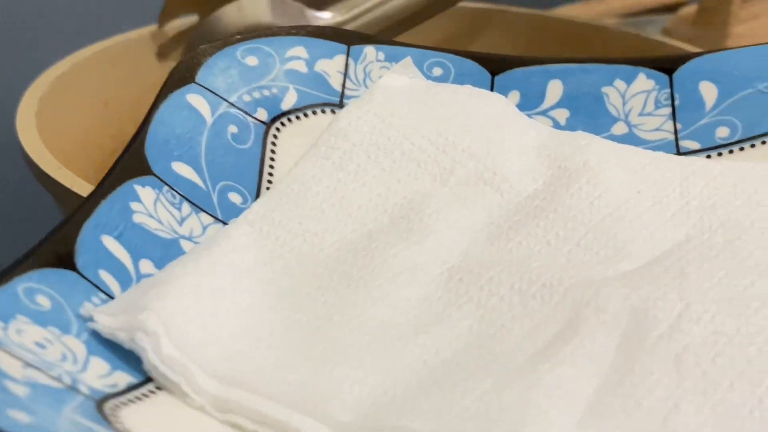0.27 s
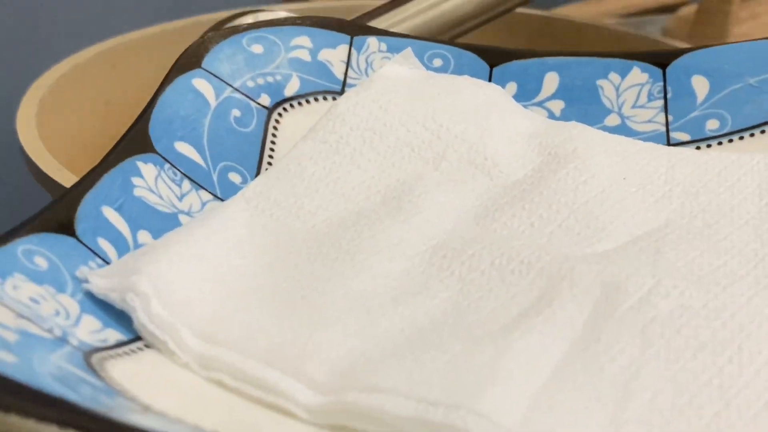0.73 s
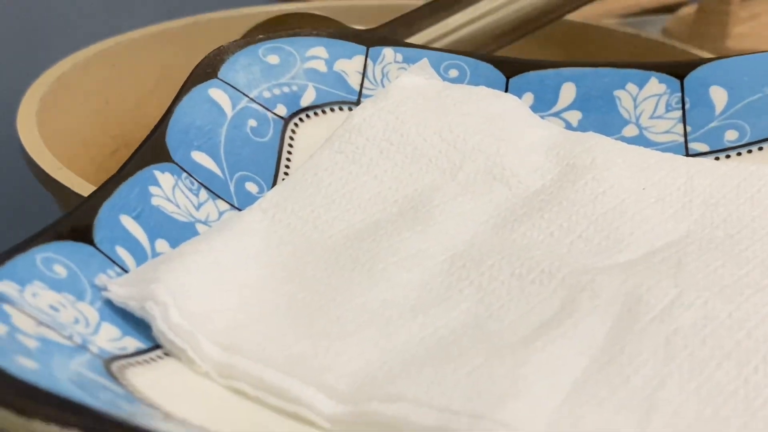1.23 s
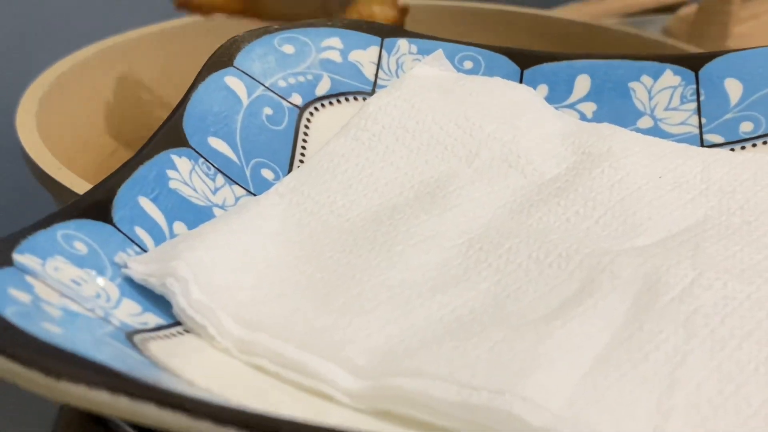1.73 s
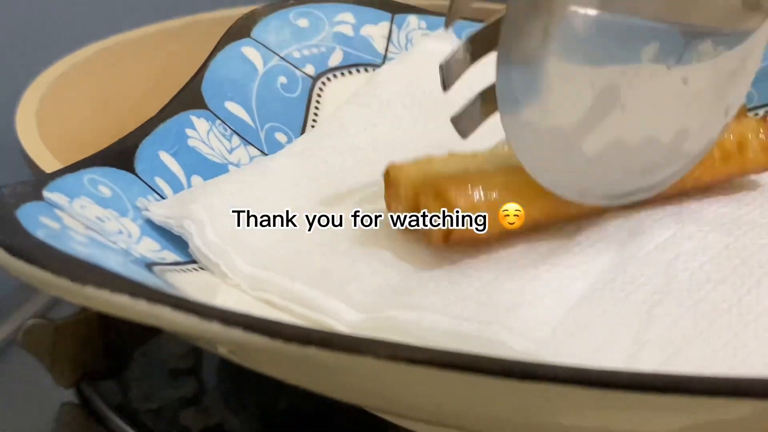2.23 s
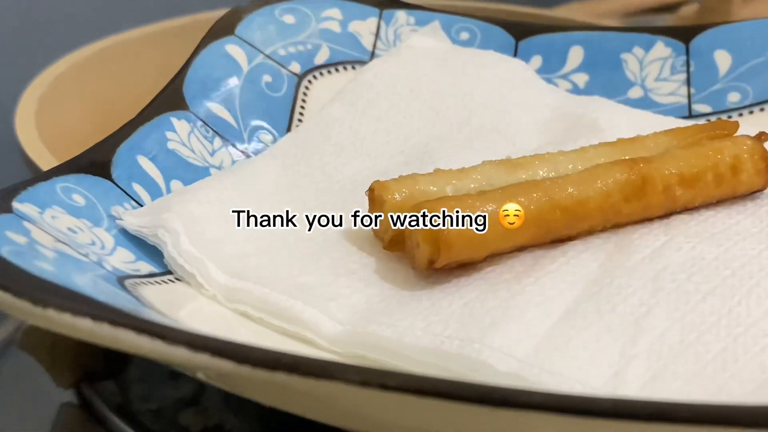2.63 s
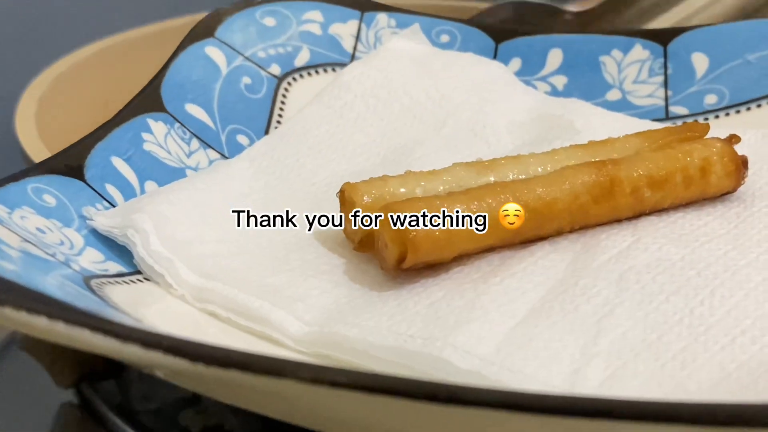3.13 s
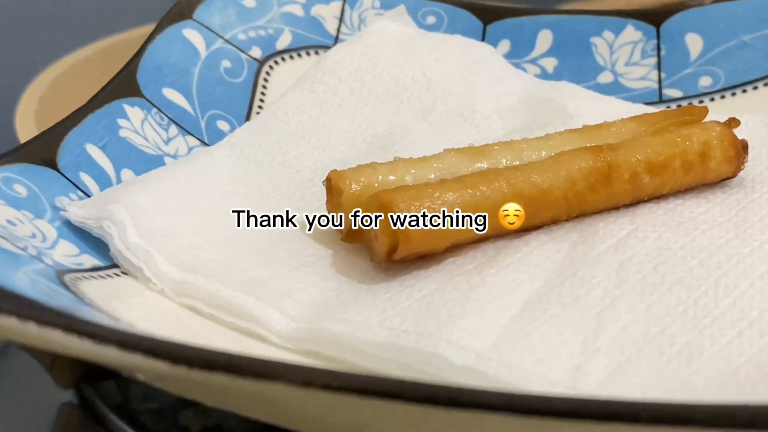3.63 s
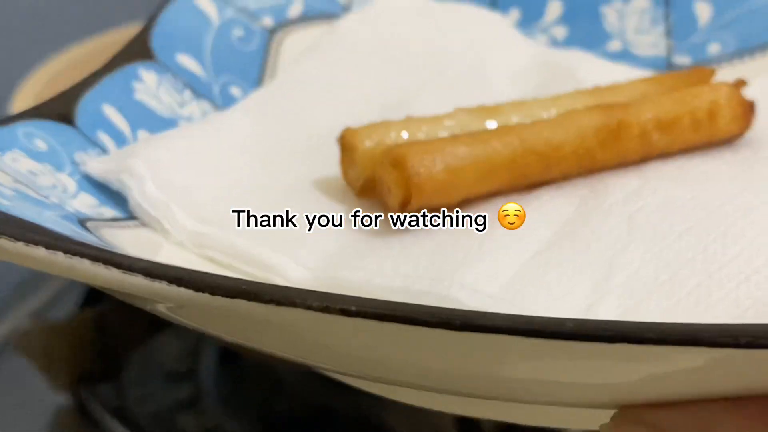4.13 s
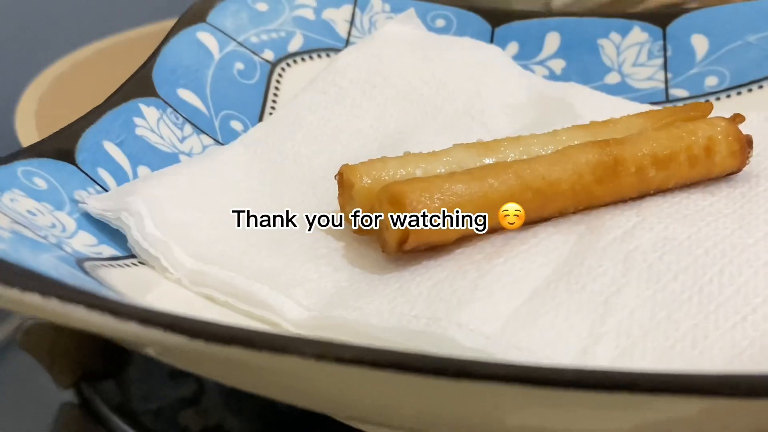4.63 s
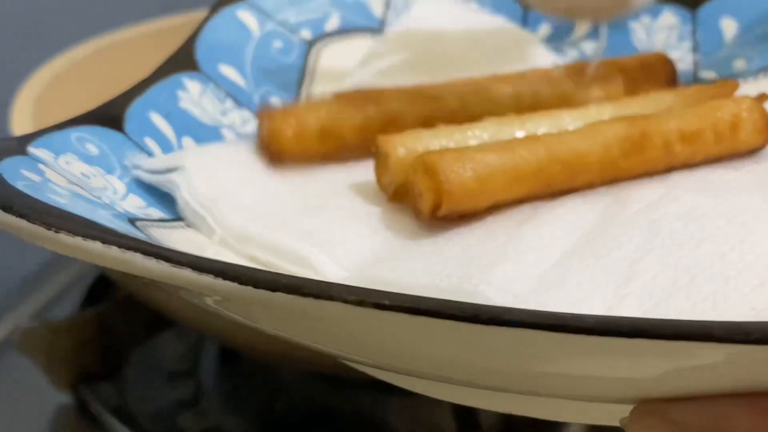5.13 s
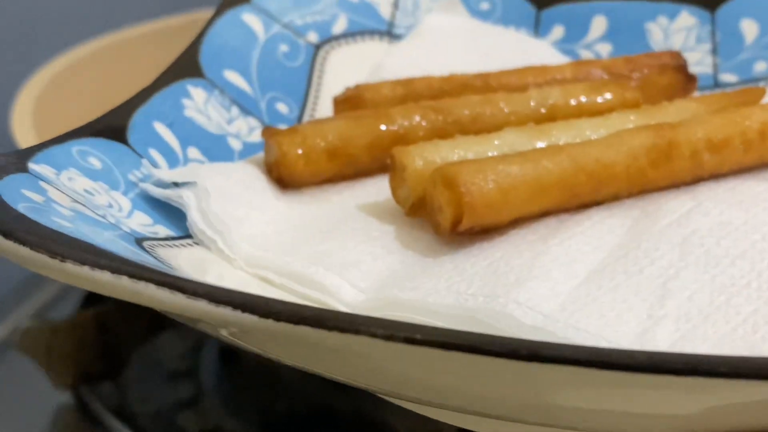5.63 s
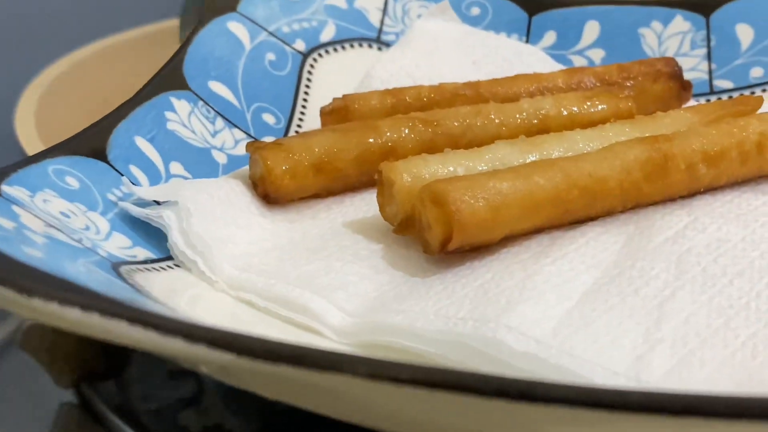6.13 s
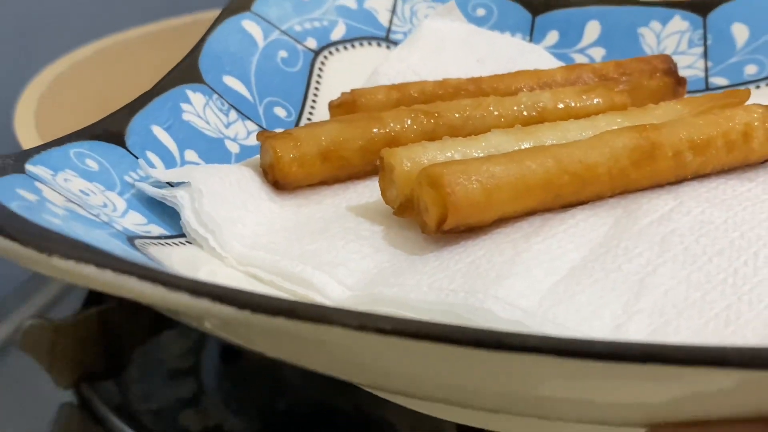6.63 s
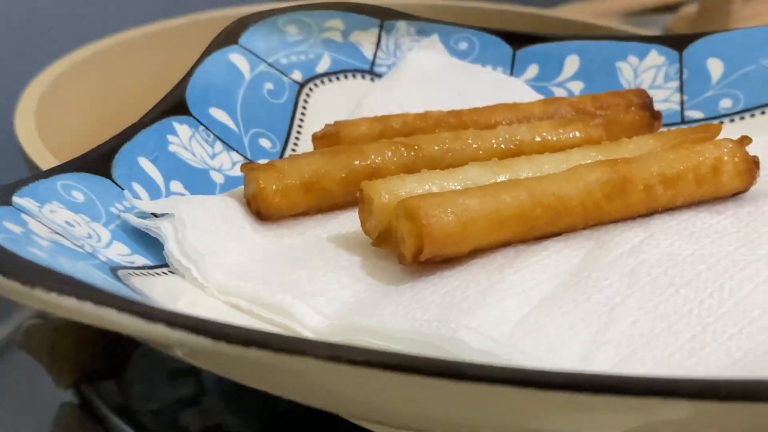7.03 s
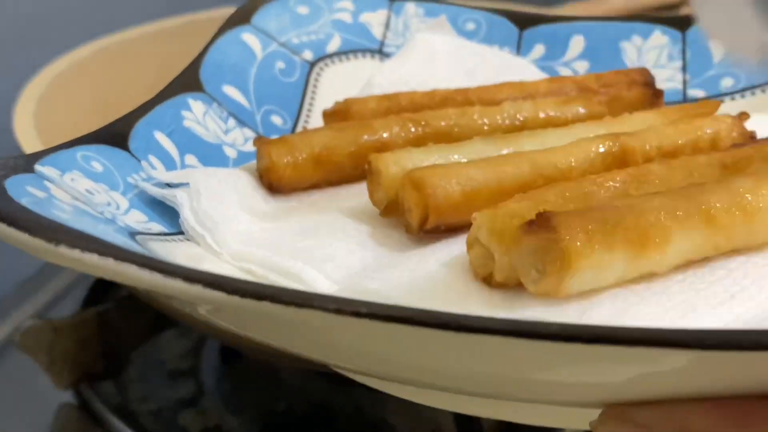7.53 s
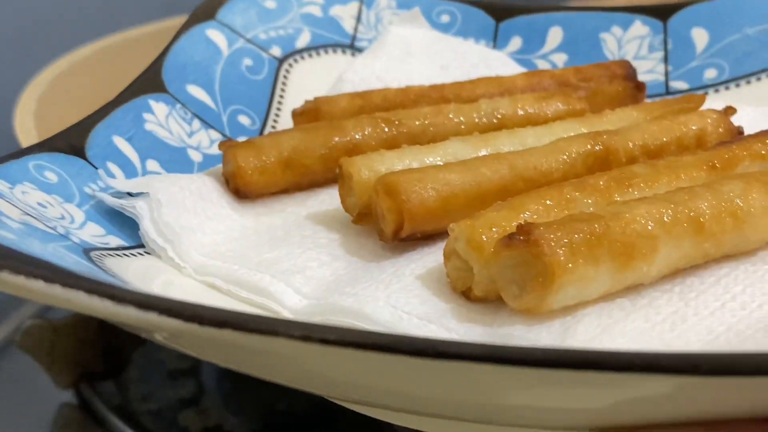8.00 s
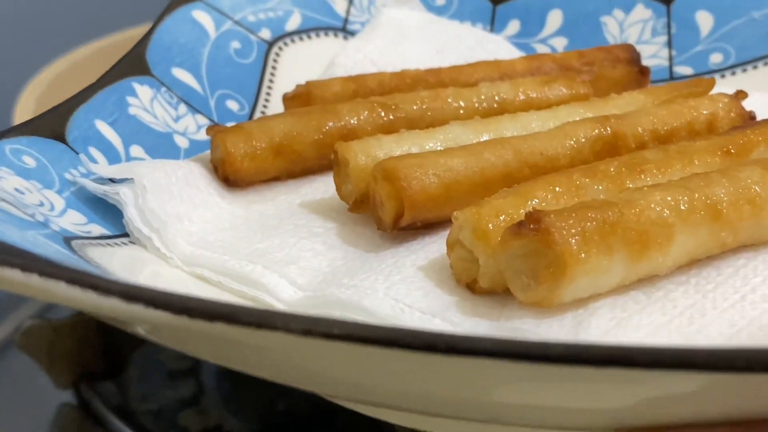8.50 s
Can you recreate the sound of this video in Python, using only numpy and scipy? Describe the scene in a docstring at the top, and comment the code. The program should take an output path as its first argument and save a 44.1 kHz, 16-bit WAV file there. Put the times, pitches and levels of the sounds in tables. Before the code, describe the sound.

Steel tongs clack and scrape in a frying pan over a faint simmer of oil and a humming cooker hood.

```python
"""Steel tongs knock, bounce and scrape in a frying pan as fried rolls are lifted out, close by.
Each knock makes a hard clack and sets the pan ringing briefly. Scraping is a run of tiny blows,
and the thin tong blades tick against each other. Bubbles simmer faintly in the hot oil,
a cooker-hood fan hums underneath, and the small kitchen's hard walls add a short echo."""
import sys
import numpy as np
from scipy import signal
from scipy.fft import rfft, irfft
from scipy.io import wavfile

SR = 44100
rng = np.random.default_rng(int(sys.argv[2]) if len(sys.argv) > 2 else 0)


def store_wav(level_fs):
    """Save 16-bit WAV to argv[1]."""
    pcm = np.round(np.clip(np.atleast_2d(level_fs), -1, 1) * 32767)
    wavfile.write(sys.argv[1], SR, pcm.T.astype(np.int16))


N = 386304


def amp(db):
    """Turns decibels into a gain."""
    return 10 ** (np.asarray(db) / 20)


def unit(x):
    """Scales a sound to an average (rms) level of 1."""
    return x / np.sqrt(np.mean(x ** 2) + 1e-20)


def read(points, hz):
    """Looks up a value between a table's rows, on a pitch scale."""
    f, value = np.transpose(points)
    return np.interp(np.log(hz + 1), np.log(f), value)


def add(mix, start_s, sound):
    """Mixes a sound in at the given time."""
    part = mix[..., max(round(start_s * SR), 0):][..., :sound.shape[-1]]
    part += sound[..., :part.shape[-1]]


def colour(x, points, size=2048):
    """Shapes the tone along (pitch [Hz], gain [dB]) points; nothing sounds early."""
    log_gain = np.log(amp(read(points, abs(np.fft.fftfreq(size, 1 / SR)))))
    taps = np.fft.ifft(np.exp(np.conj(signal.hilbert(log_gain)))).real
    return signal.oaconvolve(x, taps[None], axes=1)[:, :x.shape[1]]


def tilted(x, db_per_octave):
    """Brightens or dulls a sound around 1 kHz; flat below 500 Hz."""
    return colour(x, [(500, -db_per_octave), (1000, 0), (16000, 4 * db_per_octave)])


# the fan's low drone: (time [s], relative level [dB])
DRONE_LEVELS = [(0.0, -57), (0.36, -44), (0.46, -56), (0.78, -42.5), (1.0, -57), (1.1, -47), (2.22, -42),
                (2.49, -55), (2.61, -44), (2.9, -52), (4.03, -45.5), (4.59, -60), (5.07, -45), (5.25, -49),
                (6.05, -46), (6.54, -54.5), (7.61, -44), (8.76, -51)]
# the fan's rushing air: (pitch [Hz], relative level [dB])
AIR_TONE = [(20, -20), (38, -7), (54, 5), (100, 4.5), (140, 8.5), (180, -5), (232, 4.5), (275, -9.5),
            (450, -15.5), (720, -14), (1000, -15.5), (2300, -19), (5000, -22), (15500, -24.5)]
def fan(hum_hz=119.9, hum_db=-36.5, drone_hz=76, flutter_hz=1.6, flutter_db=-8.5, air_db=-47.5):
    """A steady mains hum, a low drone that wavers at random and a gently swelling rush of air."""
    t, hz = np.arange(N) / SR, np.fft.rfftfreq(N, 1 / SR)
    hum = amp(hum_db) * unit(np.sin(2 * np.pi * hum_hz * t))
    slow_noise = irfft(rfft(rng.standard_normal((3, N))) / (1 + (hz / flutter_hz) ** 2), N)
    along, across, swell = unit(slow_noise)
    flutter = 1 + amp(flutter_db) * (along + 1j * across)  # wavers in level and pitch
    drone = unit((flutter * np.exp(2j * np.pi * drone_hz * t)).real)
    drone *= amp(4 + np.interp(t, *np.transpose(DRONE_LEVELS)))
    air = irfft(rfft(rng.standard_normal((2, N))) * amp(read(AIR_TONE, hz)), N)
    return hum + drone, amp(air_db - 0.45 * swell) * unit(air)


# the simmer dies down as the pan empties: (time [s], level [dB])
SIMMER_LEVELS = [(0, -52), (3.6, -53.5), (4.4, -55), (8.76, -57.5)]
def oil(pops_per_s=900, spread_db=1.0):
    """Tiny bubbles burst in the cooling oil, over a soft hiss."""
    pops = rng.random((2, N)) < pops_per_s / SR
    sizes = amp(spread_db * np.minimum(rng.exponential(1, (2, N)), 4))
    fizz = unit(pops * sizes * rng.choice([-1, 1], (2, N))) + rng.standard_normal((2, N))
    fizz = colour(fizz, [(200, 5.2), (1400, 13.6), (3200, 13.5), (6500, 6.9), (8500, 2.3), (15500, 3)])
    return unit(fizz) * amp(np.interp(np.arange(N) / SR, *np.transpose(SIMMER_LEVELS)))


def burst(t, rise_s, fall_s):
    """Metal touching metal: a short chatter of noise with energy 1."""
    shape = (1 - np.exp(-(t / rise_s) ** 2)) * np.exp(-t / fall_s)
    noise = rng.standard_normal((2, len(t))) * shape
    for _ in range(3):  # even out the pitches, keeping the burst short
        spectrum = rfft(noise)
        noise = irfft(spectrum / (abs(spectrum) + 1e-12), len(t)) * np.sqrt(shape)
    return noise / np.linalg.norm(noise, axis=1, keepdims=True)


# the notes a tong blade rings at: (pitch [Hz], relative level [dB], time to fade 60 dB [s])
BLADE_NOTES = [(1550, 13, 0.019), (1940, -10, .05), (2810, 24.5, 0.022), (3080, 22, 0.066),
               (3775, 26, 0.053), (5130, -8, 0.053), (5520, 26, 0.048), (6850, 25, 0.054),
               (7500, 14, 0.013), (8000, 21, 0.018), (11100, 15, 0.031), (11300, 7, 0.0007)]
# the blades clink, alone or shaken by a hard blow:
# (time [s], relative level [dB], tilt [dB per octave], contact length [s], favoured pitch [Hz])
BLADE_TICKS = [(0.036, -58.5, -3, 0.069, 11500), (0.078, -53, 8, 0.0049, 11000),
               (0.274, -52, 0.5, 0.0078, 6850), (0.822, -51, -2.5, 0.0062, 2850),
               (.83, -46, 3.5, 0.007, 11400), (.833, -46.5, -2, 0.011, 3070), (0.857, -49, 0, 0.0075, 3700),
               (1.139, -39, -0.5, 0.007, 4200), (3.568, -55, 7, 0.0061, 11450),
               (3.8, -55.5, -2, 0.08, 11100), (3.873, -48, -2, 0.014, 4600),
               (5.615, -51, -2.5, 0.011, 11100), (8.031, -41, -6, 0.0093, 11300),
               (8.06, -57, -15, 0.013, 11400)]
def ticks(t, ping_db=7.0, ping_ratio=1.3):
    """The thin blades graze each other in short, rough clinks; the spot touched favours one note."""
    out = np.zeros((2, N))
    blade = sum(amp(db - 60 * t / fade_s) / fade_s * np.sin(2 * np.pi * hz * t)
                for hz, db, fade_s in BLADE_NOTES)
    blade /= np.linalg.norm(blade)
    for start, db, tilt, contact_s, hz in BLADE_TICKS:
        graze = burst(t, rise_s=0.00087, fall_s=contact_s)
        snap = colour(graze, [(300, -14), (2500, 2), (8000, 0), (16000, -2)])
        ringing = signal.fftconvolve(graze, blade[None], axes=1)[:, :len(t)]
        ping = [(100, -20), (300, 0), (hz / ping_ratio, 0), (hz, ping_db), (hz * ping_ratio, 0)]
        clink = colour(tilted(ringing + snap, tilt), ping)
        add(out, start, amp(db + 11) * clink / clink[0, :SR // 100].std())
    return out


# the notes the pan rings at: (pitch [Hz], relative level [dB], time to fade 60 dB [s])
PAN_NOTES = [(232.3, 0, 0.17), (377, -4.5, 0.6), (456, 3, 0.18), (524, -4, 0.26), (663.5, 8, 0.17),
             (710, 4, .09), (738.8, 7, 0.14), (845, 0.5, 0.074), (936, -11, 0.063), (1020, -5, 0.084),
             (1130, -26, .06), (1333, 7, 0.12), (1438, 12, 0.037), (1437, 8, .035), (1496, 8, 0.039),
             (1885, 0.5, 0.13), (2038, -3.5, 0.09), (2116, 2.5, 0.092), (2163, -2.5, 0.15),
             (2300, -14, 0.13), (2710, -6, 0.14), (3160, -7, 0.083), (3270, 10.5, 0.018), (3680, -7, 0.036),
             (3990, -1.5, 0.057), (4650, 3.5, 0.046), (5326, -3, 0.063), (6250, -3, 0.054), (7270, -3, .08)]
# deep notes take a moment to build up: (pitch [Hz], swell time [s])
NOTE_SWELL = [(233, 0.015), (735, 0.0095), (950, 0.004), (1400, 0.00082)]
# how far the notes lean to the left: (pitch [Hz], side over mid [ratio])
NOTE_LEAN = [(233, 0.21), (377, 0.42), (490, 0.52), (662, 0.18), (735, -0.32), (840, -.45), (1042, 0.0058),
             (1400, -0.19), (2000, -0.1)]
def pan_ring(t, lift_db=0, spread_db=3.5, twin_db=-6, detune_share=0.032):
    """The pan's notes swell and fade, each beating with a weaker twin detuned by the tongs' pressure."""
    hz, db, fade_s = np.transpose(PAN_NOTES)[:, :, None]
    strength, split, phase = rng.random((3, len(PAN_NOTES), 1))
    fade = amp(db + lift_db + spread_db * (2 * strength - 0.5) - 60 * t / fade_s)
    swell = 1 - np.exp(-(t / read(NOTE_SWELL, hz)) ** 2)
    swing = (-1) ** np.arange(len(PAN_NOTES))[:, None]  # neighbours swing in opposite directions
    twin_hz = hz * (1 + detune_share * (2 * split - 1))
    twin = amp(twin_db) * np.sin(2 * np.pi * (twin_hz * t + phase))
    notes = swing * fade * swell * (np.sin(2 * np.pi * hz * t) + twin)
    return np.array([notes.sum(0), (read(NOTE_LEAN, hz) * notes).sum(0)])  # mid, side


# the tone of pan and tongs together: (pitch [Hz], gain [dB])
CLACK_TONE = [(100, -25.5), (210, -14.5), (310, -14), (650, -6.5), (1100, -7), (1400, -5.5), (1720, -8),
              (2100, -4.5), (2700, -5), (3270, -8.5), (3950, -9.5), (6500, -8), (8200, -16.5),
              (10500, -20.5), (15500, -29)]
def clack(contact):
    """Many crowded notes of pan and steel die so fast that they blur into a clack."""
    return colour(contact, CLACK_TONE)


# tongs dragged over the pan floor:
# (start [s], end [s], relative level [dB], tilt [dB per octave], rub pitch [Hz], pan ring [dB])
PAN_SCRAPES = [(0.281, 0.358, -54.5, -10, 444, -16), (0.388, 0.495, -50, -6, 430, -19),
               (0.758, 0.872, -50.5, -9, 483, -13), (0.917, 0.987, -50.5, -5, 480, -9),
               (3.762, 3.893, -39, -2, 330, 2), (3.99, 4.22, -46.5, -3, 735, 7.5),
               (4.581, 4.668, -55, -5.5, 497, -17), (5.622, 5.678, -42.5, -1, 700, -6),
               (5.716, 5.78, -37.5, -5, 447, -6), (5.796, 5.897, -55, -5, 680, 8),
               (6.214, 6.373, -54.5, -2.5, 476, -1), (8.473, 8.528, -51, -7.5, 410, -7)]
def scrapes(t, slips_per_s=400, spread_db=3.0, damped_s=0.034, rasp_db=54.0,
            press_s=0.0062, lift_s=0.047, grow_db=4, rub_db=8.5, rub_ratio=1.8):
    """Sticking and slipping steel sends a run of small blows into the pan."""
    out = np.zeros((2, N))
    for start, end, db, tilt, hz, ring_db in PAN_SCRAPES:
        ringing = amp(ring_db) * pan_ring(t) * np.exp(-t / damped_s)  # the pressing tongs damp the pan
        one_slip = ringing + amp(rasp_db) * clack(burst(t, rise_s=0.0012, fall_s=0.0045))
        n = max(round((end - start) * SR), 256)
        age = np.arange(n) / SR
        slips = (rng.random(N) < slips_per_s / SR) * rng.choice([-1, 1], N)
        slips = slips * amp(spread_db * rng.standard_normal(N))
        # the tongs press down, grow louder along the stroke, then lift
        stroke = np.minimum(age / press_s, 1) * amp(grow_db * age / age[-1])
        stroke *= np.minimum(age[::-1] / lift_s, 1)
        rub = signal.fftconvolve((slips[:n] * stroke)[None], one_slip, axes=1)
        hump = [(80, -20), (180, 0), (hz / rub_ratio, 0), (hz, rub_db), (hz * rub_ratio, 0)]
        rub = colour(tilted(rub, tilt), hump)
        add(out, start, amp(db) * rub * np.sqrt(n) / (np.linalg.norm(rub[0]) + 1e-9))
    return out


def strike_point(thud_db, clang_db, chime_db, favoured_hz):
    """The spot struck lifts or lowers the pan's thud, clang and chime, and favours one more note."""
    hz = np.array(PAN_NOTES)[:, :1]
    # (pitch [Hz], width [octaves], lift [dB])
    lifts = [(233, 0.5, thud_db), (1333, 0.09, clang_db), (2110, 0.09, chime_db), (favoured_hz, 0.09, 11)]
    return sum(db * np.exp(-(np.log2(hz / centre) / width) ** 2) for centre, width, db in lifts)


def blow_tone(depth_db, hard_db, snap_db, dip_db=-2):
    """Where a blow lands sets its depth, how hard its brightness; dips part the pan's groups of notes."""
    bite, presence, treble = 0.79 * hard_db - 0.4, hard_db - 1, hard_db - 10.5
    low_dip = depth_db / 2 + dip_db
    return [(250, 0), (420, 0.17 * depth_db), (540, low_dip), (690, depth_db), (980, low_dip),
            (1380, 0), (1730, bite / 2 + dip_db), (2100, bite), (2600, (bite + presence) / 2 + dip_db),
            (3250, presence), (4000, (presence + treble) / 2 + dip_db),
            (5000, treble), (7000, treble), (11000, treble + snap_db)]


# tongs hit the pan: (time [s], strength [dB], depth [dB], hardness [dB], steel snap [dB],
# contact length [s], pan ring [dB], thud [dB], clang [dB], chime [dB], favoured pitch [Hz])
PAN_KNOCKS = [(0.385, -43, 11, 0, -4, 0.0029, -8, 19, 0, 6, 2770),
              (0.4571, -36, 4, -2, -2, .0018, -9, 14, -5, 2, 1040),
              (0.629, -44.5, -1, 3.5, -2, 0.0028, -9, -3, 8, -9, 4140),
              (0.7547, -37.5, 7, -2, 0, 0.0021, -21, 10, -2, -3, 2650),
              (0.8284, -36.5, 10, -4, 4, 0.0015, -23, 1, 0, 0, 2700),
              (0.8565, -45, 0, 7, 4, 0.0015, -19, 1, -2, -2, 2700),
              (0.916, -26.5, 0.5, -14, 2, 0.0021, -4.5, 8, -7, -8, 1877),
              (0.947, -36, 0, -3.5, 14, .0013, -17, -2, -8, 0, 2720),
              (1.1376, -16.5, 3, 3.5, -3, 0.0027, -5, -15, 0, -6, 1417),
              (2.953, -22, 3.5, 3, -2, 0.0025, -1.5, -22, 5, 0.5, 3120),
              (3.25, -18.5, 3.5, 1, 1.5, 0.0024, -1, -5.5, 2.5, -7, 3140),
              (3.7412, -20.5, 0.5, -0.5, 2.5, 0.0015, -1.5, 3, 2, -13, 7560),
              (3.7873, -18.5, -7, -10, 4, 0.0023, -10, -10, -8, 17, 4600),
              (3.808, -37, 0, -7, 0, 0.0023, 3, -1, 0, 9, 4600),
              (3.836, -42, 2, -7, 0, 0.0015, -2, -3, 7, 1, 6500),
              (3.875, -54, -9, -10, 0, 0.0015, -6, -1, -5, 12, 2310),
              (3.988, -39.5, 18, -6, 0, .0015, -1, -6, -9, 0, 2310),
              (3.996, -37.5, 3, -14, 0, .003, 1, -3, -9, 6, 2700),
              (4.0125, -33, 4, -13, 0, 0.0037, -1, 4, 6.5, 14, 2700),
              (4.069, -36.5, 0, -5.5, 2, 0.0047, -7, 9, 3, -4, 4120),
              (4.133, -51.5, -8, 3, 0, 0.0039, 3.5, 19, -3, -8, 4600),
              (4.162, -49.5, 4, 6, 0, 0.0035, -3, 12, 9, 0, 2310),
              (4.188, -52, 4, -4, 5, 0.0036, -4, 5, -7, -4, 2700),
              (5.114, -34.5, -0.5, -14, 6, 0.0015, -13.5, 8, -1, -4, 1120),
              (5.6117, -19, 7, 4.5, 1.5, 0.0031, -1, -2.5, -5, 2, 5330),
              (5.754, -29.5, 1, 6.5, -4, 0.0022, -1, -19, 6.5, 1.5, 3220),
              (5.805, -49, 12, -13, 0, .004, -4, -3, -5, 2, 662),
              (6.1325, -34, -4.5, -5.5, 0, .002, -13.5, 6, 3, 7, 2700),
              (6.29, -47, 14.5, -2, 0, 0.0026, -3.5, 9, -8, 0, 1046),
              (6.49, -17.5, 0, -1.5, 0, 0.0028, -8, -12, 7, 4.5, 3540),
              (8.0226, -18.5, 0.5, 0.5, 2, 0.0015, -1.5, -2, -3, 7, 5330),
              (8.031, -24.5, 5, 8, 1, 0.002, 1.5, 3, -4, 5.5, 3230),
              (8.068, -22, 3, -3, 2, 0.0027, -6, -3, 4, 13, 4610),
              (8.7072, -25, 11.5, -3.5, -4, 0.0029, -4.5, 1, 8, 8, 4000)]
def knocks(t, ring_depth_share=0.64, chatter_stretch=2.9, rise_share=0.24):
    """Each blow gives a hard clack, chatters briefly and sets the pan ringing."""
    clacks, rings = np.zeros((2, 2, N))
    for start, db, depth_db, hard_db, snap_db, contact_s, ring_db, *spot in PAN_KNOCKS:
        chatter_s = chatter_stretch * contact_s
        contact = burst(t, rise_share * contact_s, contact_s) + burst(t, rise_share * chatter_s, chatter_s)
        hit = colour(clack(contact), blow_tone(depth_db, hard_db, snap_db))
        ringing = pan_ring(t, strike_point(*spot))
        ringing = colour(ringing, blow_tone(ring_depth_share * depth_db, hard_db, snap_db))
        add(clacks, start, amp(db + 35) * hit)
        add(rings, start, amp(db + ring_db - 10.5) * ringing)
    return clacks, rings


# how long the kitchen echoes: (pitch [Hz], time to fade 60 dB [s])
ECHO_FADE = [(200, 0.73), (380, 0.44), (600, 0.35), (1500, 0.38), (3000, 0.33), (6000, 0.32), (11000, 0.37)]
# the tone of the echo: (pitch [Hz], gain [dB])
ECHO_TONE = [(150, 2), (235, 1.5), (305, -0.5), (380, 6), (470, 5), (700, 1.5), (1200, -3), (2500, -5),
             (6000, -6.5), (14000, -7.5)]
def kitchen_echo(x, echo_db=1.0, first_s=0.0045, slot_samples=22):
    """Sound bounces off the hard walls, each pitch dying away at its own speed."""
    slots = np.arange(0, SR - slot_samples, slot_samples)
    arrivals = slots + rng.integers(0, slot_samples, (2, len(slots)))
    bounces = np.zeros((2, SR))
    np.put_along_axis(bounces, arrivals, rng.choice([-1., 1.], arrivals.shape), 1)
    hz, t, bands = signal.stft(bounces, SR, nperseg=256)
    tail = signal.istft(bands * amp(-60 * t / read(ECHO_FADE, hz)[:, None]), SR, nperseg=256)[1]
    tail *= np.arange(tail.shape[1]) > first_s * SR
    tail = colour(tail / np.linalg.norm(tail[0]), ECHO_TONE)
    return amp(echo_db) * signal.fftconvolve(x[:1], tail, axes=1)[:, :N]


# how wide the scattered sound is: (pitch [Hz], side gain [dB])
STEREO_WIDTH = [(100, -41), (280, -4), (650, -5), (1400, 1), (2200, -18), (3200, -65), (4500, -48),
                (7000, -50), (9000, -40), (16000, -4)]
def scene(ring_echo_db=-11.5):
    """Mixes mid (what both ears share) and side (how they differ) into left and right."""
    t = np.arange(SR * 2 // 5) / SR  # 0.4 s for one blow to ring out
    hum, air = fan()
    clacks, rings = knocks(t)
    contacts = clacks + scrapes(t)
    clinks = ticks(t)
    echo = kitchen_echo(contacts + amp(ring_echo_db) * rings + clinks)
    mid, side = contacts + clinks + echo + oil() + air
    mid = mid + rings[0]
    side = colour(side[None], STEREO_WIDTH)[0] + rings[1]
    return np.array([mid + side, mid - side]) + hum * amp([[0.9], [-1.1]])  # the hum leans left


# in the high treble two microphones swing in and out of step: (pitch [Hz], phase gap [turns])
MIC_PHASE = [(7200, 0), (8100, .25), (9100, .5), (11200, 1), (13350, 1.5), (15400, 2)]
def record(dry, ceiling=0.75, top_hz=15900):
    """The microphone pair shifts the treble's phase; peaks are rounded and the highest treble is cut."""
    turns = np.interp(np.fft.rfftfreq(N, 1 / SR), *np.transpose(MIC_PHASE))
    pair = irfft(rfft(dry) * np.exp(1j * np.pi * np.array([turns, -turns])), N)
    rounded = pair / (1 + (pair / ceiling) ** 4) ** 0.25
    low_pass = signal.firwin(511, top_hz, window=("kaiser", 9), fs=SR)
    return signal.oaconvolve(rounded, low_pass[None], "same")


dry = scene()
out = record(dry)
store_wav(out)
```